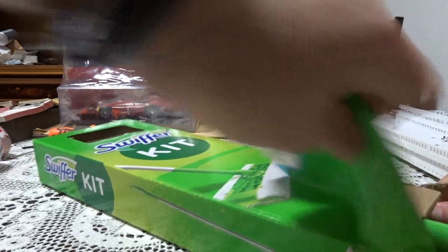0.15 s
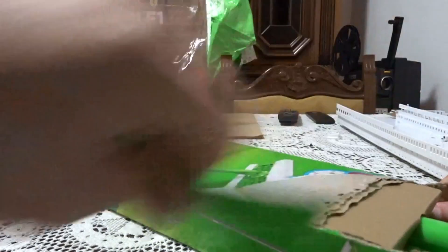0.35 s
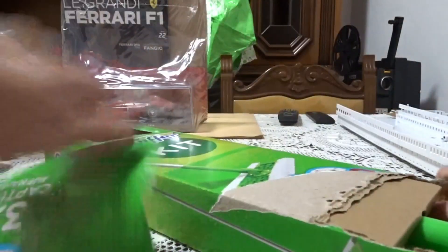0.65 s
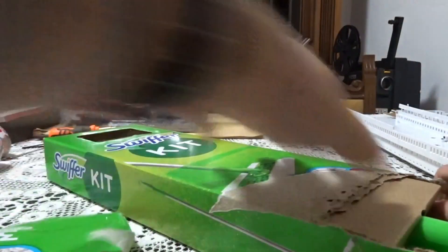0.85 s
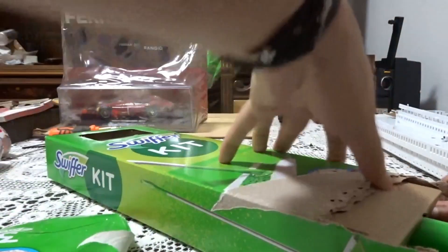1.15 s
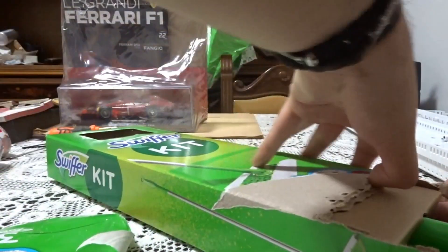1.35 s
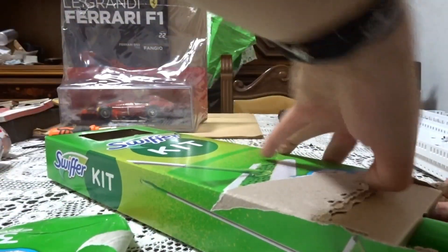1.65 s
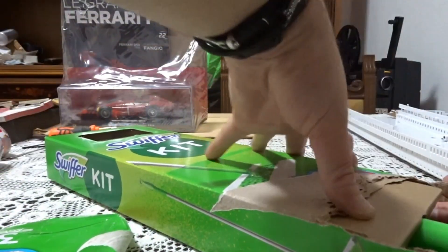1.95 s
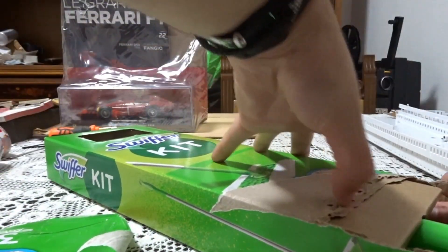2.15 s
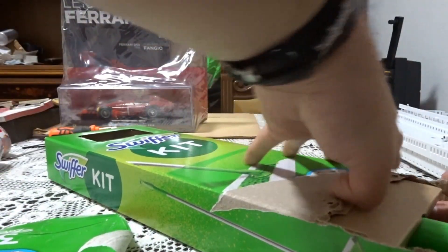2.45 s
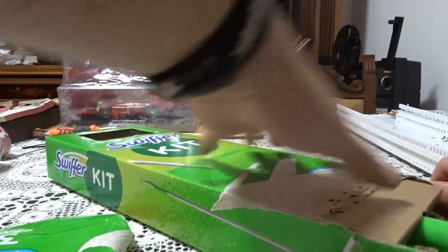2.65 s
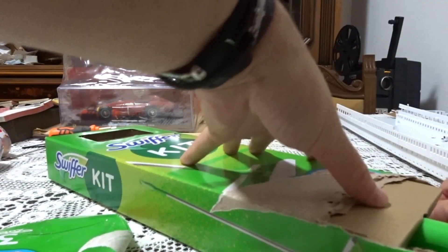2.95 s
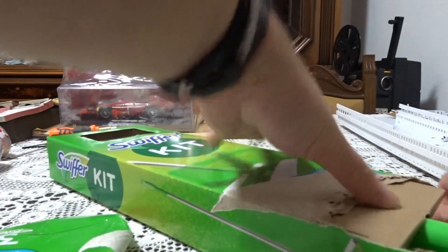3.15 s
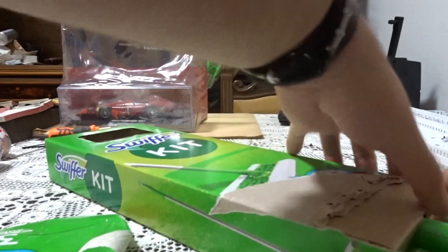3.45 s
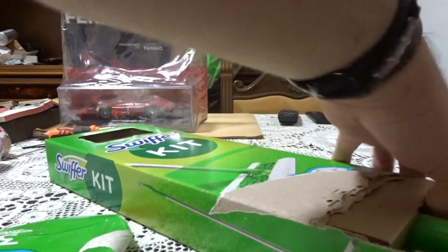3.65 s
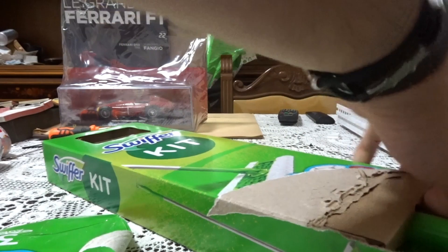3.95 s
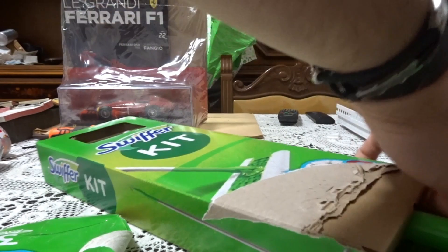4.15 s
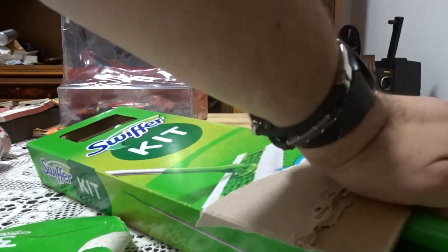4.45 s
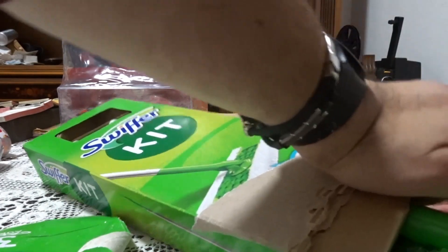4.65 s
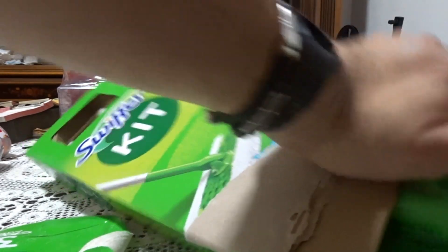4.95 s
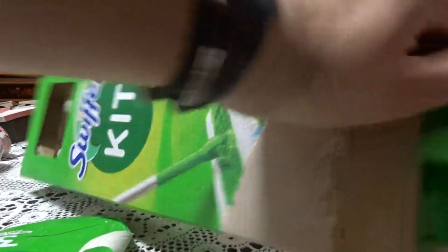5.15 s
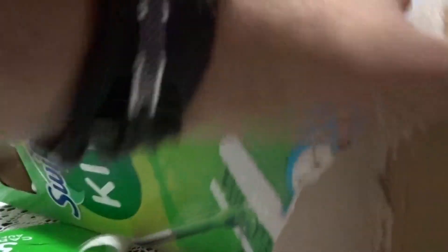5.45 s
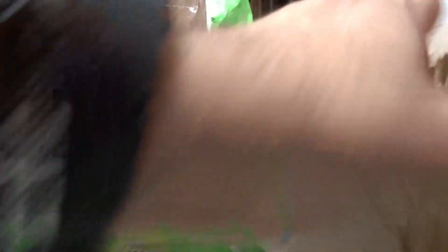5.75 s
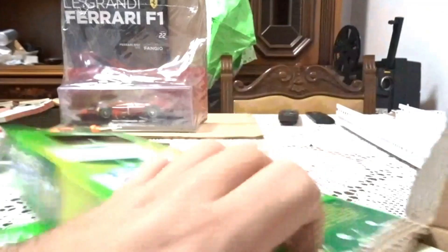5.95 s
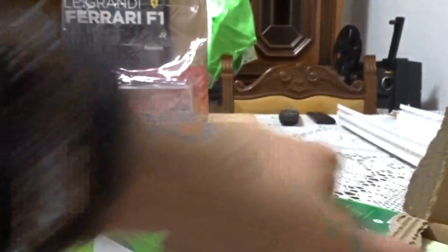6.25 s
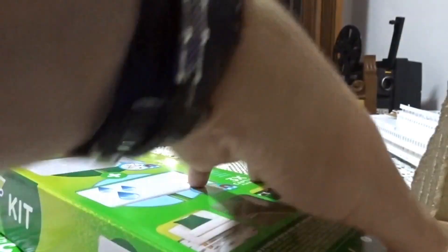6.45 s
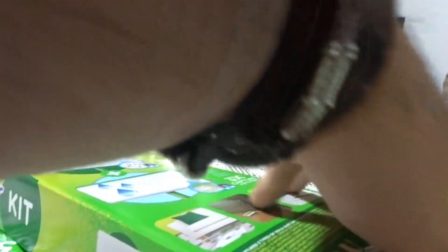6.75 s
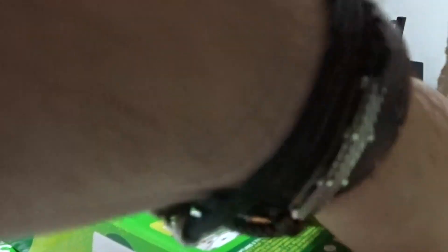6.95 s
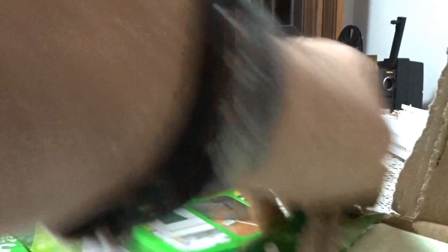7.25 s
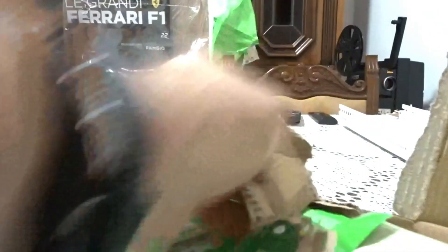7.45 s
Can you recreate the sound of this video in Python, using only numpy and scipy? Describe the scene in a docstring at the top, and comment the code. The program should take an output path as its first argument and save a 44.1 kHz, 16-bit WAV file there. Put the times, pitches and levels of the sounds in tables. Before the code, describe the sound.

Hands tear stiff paperboard, slightly to the right and near the microphone. Dry, grainy ripping stops abruptly, leaving fingernail picks and dull pops from the hollow box over a faint hiss. A brief rip breaks the quiet, soft rubbing continues, crackling builds, the box flexes with low pops and rips again. After softer handling, rapid snaps crowd into a last crunchy tear. Short, dry indoor sound.

```python
"""A long rip of cardboard is heard first: hands tear open a box on a table, close to a small stereo camera.
Random fibre breaks crackle through the rips and the fingernail's picks, and shake the lid and hollow box.
Glue cracks and crease pops are decaying, phase-wandering tones with noise; knocks are struck panel modes;
faint narrow bands of noise swell and fade. Evenly decaying noise gives the furnished room's answer,
and shaped noise its faint background hush."""
import sys
import numpy as np
from scipy import signal
from scipy.fft import rfft, irfft, next_fast_len
from scipy.io import wavfile
from scipy.ndimage import uniform_filter1d, map_coordinates

SR = 44100
rng = np.random.default_rng(int(sys.argv[2]) if len(sys.argv) > 2 else 0)


def generate_wav(sig):
    """Save sig (samples, or channels by samples) to the path in sys.argv[1] as 16-bit PCM at SR."""
    pcm = np.round(np.clip(np.atleast_2d(sig).T, -1, 1) * 32767).astype(np.int16)
    wavfile.write(sys.argv[1], SR, pcm)


N = 334719

# spectrum of the background hush: f/Hz, level/dB
HUSH_SPECTRUM = [(160, -40), (310, -13), (760, -5), (2400, 0), (3600, 4.5), (11200, -25)]
# decay of the room, equally fast at all frequencies: f/Hz, time to fall by 60 dB/s
ROOM_DECAY = [(200, 0.12), (10000, 0.12)]
# coherence of diffuse sound: f/Hz, left-right likeness [0-1]
PORT_LIKENESS = [(300, 1), (1500, 0.19), (6000, 0.11)]
# level of the right port over the left: f/Hz, level difference/dB
RIGHT_OVER_LEFT = [(250, -1.5), (1200, 3), (10000, 2.5)]
# faint narrow bands of noise that swell and fade: start t/s, length/s, f/Hz, bandwidth/Hz, level/dB
NOISE_BANDS = [(0.806, 0.26, 2900, 200, -50.5), (3.145, 0.47, 2960, 150, -52.5),
               (4.482, 0.26, 4100, 400, -42), (4.495, 0.5, 710, 130, -44), (6.417, 0.37, 1670, 330, -39.5)]
# resonances of a panel pushed by the fingers: f/Hz, bandwidth/Hz, level/dB
PANEL_MODES = [(400, 114, 1.5), (1000, 450, -4.5)]
# low knocks of buckling panels: t/s, peak level/dB
PANEL_KNOCKS = [(2.361, -14), (2.381, -12.5), (2.868, -26.5), (2.891, -26.5), (2.906, -26.5),
                (2.946, -28.5), (2.958, -27), (2.97, -25), (2.996, -31), (3.022, -26.5), (3.066, -27.5),
                (5.399, -27), (5.491, -13), (5.509, -27)]
# resonances of the panels and air of the box: f/Hz, bandwidth/Hz, level/dB
BOX_MODES = [(321.6, 86, -2), (410, 58, 3.5), (486, 123, 0), (625, 117, -1)]
# bright cracks of glue and fibre bundles: t/s, peak level/dB, board f/Hz
GLUE_CRACKS = [(0.226, -18, 3250), (0.413, -2, 2810), (0.628, -16.5, 4880), (1.452, -21.5, 1000),
               (2.143, -17, 1035), (2.408, -22, 7100), (2.511, -19.5, 1116), (2.734, -12.5, 2600),
               (2.8, -4, 2610), (3.053, -20.5, 2770), (3.76, -18.5, 1015), (3.821, -10.5, 3520),
               (3.902, -15, 1860), (4.052, -10.5, 4105), (4.55, -19, 800), (4.667, -12, 4140),
               (4.746, -18.5, 1350), (4.782, -9.5, 2420), (4.819, -10.5, 2990), (5.014, -12, 5230),
               (5.231, -10, 1994), (5.717, -4.5, 943), (6.257, -28, 1160), (6.437, -26, 1520),
               (6.749, -17.5, 1690), (7.003, -22, 900), (7.089, -8.5, 1980), (7.172, -7.5, 1950),
               (7.202, -8, 2830), (7.215, -9, 1010), (7.23, -7.5, 3340), (7.238, -7, 2100),
               (7.251, -3.5, 2850), (7.299, -4, 1520), (7.329, -3, 3710), (7.365, -6.5, 4920),
               (7.43, -8, 1573), (7.437, -8, 1910), (7.51, -15, 4000), (7.53, -15.5, 1932)]
# duller pops of creases: t/s, peak level/dB, board f/Hz
CREASE_POPS = [(0.066, -9, 3560), (0.152, -8.5, 1810), (0.446, -10, 1765), (0.66, -18, 1275),
               (0.927, -17.5, 1045), (1.229, -23, 1004), (1.465, -27, 1030), (1.487, -22.5, 994),
               (1.684, -18.5, 960), (2.156, -25, 1100), (2.168, -31, 1000), (2.178, -23, 844),
               (2.364, -4.5, 1035), (3.088, -16.5, 1570), (4.764, -24, 1980), (5.186, -13.5, 2046),
               (5.192, -9, 1693), (5.294, -17, 985), (5.49, -13.5, 1035), (5.513, -18.5, 1560),
               (5.667, -18.5, 1260), (5.691, -10.5, 1200), (5.708, -13, 1190), (5.911, -10.5, 1300),
               (5.923, -9, 1104), (6.068, -21, 1700), (6.097, -17.5, 874), (6.508, -19.5, 1830),
               (7.268, -9.5, 823)]
# resonances of the lid lying on the box: f/Hz, bandwidth/Hz, level/dB
LID_MODES = [(1020, 156, 3), (1942, 120, -2.5), (3020, 130, -5)]
# resonances of the lid pulled loose: f/Hz, bandwidth/Hz, level/dB
FLAP_MODES = [(857, 167, -0.5), (1710, 610, 0), (2930, 1900, -10)]
# how much of the lid hangs loose: t/s, share [0-1]
LOOSE_SHARE = [(.8, 1), (.9, 0), (2.6, 0.13), (3.6, 0.9)]
# spectrum of breaking fibres: f/Hz, level/dB
FIBRE_SPECTRUM = [(1200, -14), (2200, -3), (3600, 0), (10400, -6), (11500, -9)]
# the hands never lie quite still: level/dB of the fibres, the shaken lid, the hollow box
RESTING_LEVELS = (-64.5, -55, -59)
# short picks and rubs at the torn edge: peak t/s, fall/s, fibre level/dB, lid level/dB, box level/dB
EDGE_PICKS = [(0.464, 0.089, -31, -31, -39), (.51, 0.78, -40.5, -41, -58),
              (0.937, 0.095, -45.5, -34.5, -32.5), (1.117, 0.16, -44, -44, -42.5),
              (1.213, 0.2, -44.5, -41, -42.5), (1.346, 0.045, -53, -40, -39.5),
              (1.476, 0.1, -43, -40.5, -37), (1.699, 0.17, -39.5, -36.5, -38.5),
              (1.854, 0.078, -46, -44, -38), (2.02, 0.27, -47, -54.5, -45), (2.134, 0.13, -44, -44, -34),
              (2.395, 0.19, -45, -35, -32.5), (2.545, 0.12, -40.5, -39.5, -42),
              (3.102, 0.46, -44.5, -44, -47.5), (3.424, 0.13, -45, -41.5, -38.5),
              (3.65, 0.54, -43.5, -45, -51), (3.826, 0.19, -39.5, -41.5, -67),
              (4.06, 0.29, -43.5, -46, -62), (4.264, 0.2, -40.5, -39.5, -52), (4.667, 0.059, -29, -32, -42),
              (5.289, 0.22, -38.5, -36.5, -35), (5.406, 0.28, -39.5, -38.5, -45),
              (5.51, 0.21, -64, -39, -38), (5.929, 0.23, -59, -29.5, -36), (6.268, 0.8, -50, -51, -57),
              (6.499, 0.53, -48.5, -45.5, -46.5), (6.658, 0.16, -37.5, -31.5, -40.5),
              (6.9, 1, -45.5, -44.5, -55)]
# long pulls: full pull reached t/s, rise/s, hold/s, fall/s, fibre level/dB, lid level/dB, box level/dB
LONG_RIPS = [(0, .01, 0.446, 0.03, -24, -29.5, -32.5), (2.79, 0.1, 0.0035, 0.17, -22.5, -25, -32),
             (4.8, 0.5, 0.07, 0.5, -34, -35, -42), (5.735, 0.1, 0.082, 0.24, -24, -26, -32.5),
             (7.09, 0.15, 0.066, 0.24, -34, -34, -40), (7.22, 0.15, 0.1, 0.13, -32, -32, -40),
             (7.395, 0.052, 0.051, 0.22, -24.5, -24, -36)]


def amp(db):
    """Definition of level: amplitude is 10 to the power dB/20."""
    return 10 ** (np.asarray(db) / 20)


def unit(x):
    """Normalization: scale to a root-mean-square value of one."""
    return x / np.sqrt(np.mean(x ** 2) + 1e-20)


def along(points, hz):
    """Interpolation of (f, value) points on a logarithmic frequency axis."""
    f, value = np.transpose(points)
    return np.interp(np.log(hz + 1), np.log(f + 1), value)


def wobble(rate):
    """Band-limited fluctuation: a smooth random curve with rate knots a second."""
    knots = rng.standard_normal(int(N * rate / SR) + 4)
    return map_coordinates(knots, [np.arange(N) * rate / SR])


def filtered(x, response):
    """Linear filtering: the spectrum is multiplied by a complex frequency response."""
    m = next_fast_len(N + SR // 2)
    return irfft(rfft(x, m) * response(np.fft.rfftfreq(m, 1 / SR)), m)[..., :N]


def modes(table):
    """Modal superposition: damped resonances of alternating sign add to a causal response."""
    def response(f):
        total = 0
        for k, (centre, width, db) in enumerate(table):
            resonance = 1j * f * width / (centre ** 2 - f ** 2 + 1j * f * width)
            total = total + (-1) ** k * amp(db) * resonance
        return total
    return response


def diffuse(pair):
    """Spatial coherence: unrelated signals are mixed so that both ports share the bass."""
    def mix(hz):
        angle = np.arccos(np.clip(along(PORT_LIKENESS, hz), -1, 1)) / 2
        return np.array([np.cos(angle), np.sin(angle)])
    mid, side = filtered(pair, mix)
    return np.array([mid + side, mid - side])


def slips(per_s, spread_db, clump_db, clumps_per_s, bed):
    """Intermittent impulses: clumped random breaks of unequal size over a bed of tiny ones."""
    happens = rng.random(N) < per_s / SR
    sizes = amp(spread_db * rng.standard_normal(N).clip(-2, 2))
    breaks = unit(happens * rng.standard_normal(N) * sizes)
    return amp(clump_db * wobble(clumps_per_s)) * (breaks + bed * rng.standard_normal(N))


def shifting(x, patchy_db):
    """Time-varying resonance: loose flaps change shape, so the colour shifts in short patches."""
    z = signal.stft(x, nperseg=256)[2]
    field = uniform_filter1d(rng.standard_normal(z.shape), size=4, axis=-2)  # across frequency
    field = uniform_filter1d(field, size=14, axis=-1)  # across time
    return signal.istft(z * amp(patchy_db * unit(field)), nperseg=256)[1][..., :N]


def hush():
    """Ambient noise: a shaped, diffuse spectrum whose level sways slowly."""
    level_db, sway_db = -54, 2
    noise = filtered(rng.standard_normal((2, N)), lambda hz: amp(along(HUSH_SPECTRUM, hz)))
    return amp(level_db + sway_db * wobble(4.36)) * unit(diffuse(noise))


def room(x):
    """Reverberation: convolution with noise that dies away equally fast, in 0.12 s, at all frequencies."""
    hz, t, z = signal.stft(rng.standard_normal((2, SR // 2)), SR, nperseg=256)
    decay = amp(-60 * t / along(ROOM_DECAY, hz)[:, None])
    tail = signal.istft(z * decay, SR, nperseg=256)[1]
    delayed = np.pad(x, (200, 0))[None]  # samples before the answer begins
    answer = signal.fftconvolve(delayed, tail / np.linalg.norm(tail[0]), axes=1)
    return diffuse(answer[:, :N])


def ports(x, lag_s):
    """Level and time differences: the box lies to the right; that port is nearer and less shaded."""
    side = np.array([[-.5], [.5]])

    def response(hz):
        level = amp(side * along(RIGHT_OVER_LEFT, hz))
        return level * np.exp(2j * np.pi * hz * lag_s * side)
    return filtered(x, response)


def noise_bands():
    """Resonant filtering of noise: faint, narrow, uneven bands swell and fade."""
    t, out = np.arange(N) / SR, np.zeros(N)
    for start, length, hz, width, db in NOISE_BANDS:
        uneven = slips(1500, spread_db=6, clump_db=1.5, clumps_per_s=30, bed=3.1)
        band = unit(filtered(uneven, modes([(hz, width, 0)])))
        progress = ((t - start) / length).clip(0, 1)
        swell = np.sqrt(np.sin(np.pi * progress).clip(0))
        out += amp(db) * swell * band
    return out


def knocks():
    """Impulse response: a short soft push bends the panel once and it rings for a few cycles."""
    push_s = .0005  # time to the push's peak
    blows, t = np.zeros(N), np.arange(SR // 10) / SR
    s, db = np.transpose(PANEL_KNOCKS)
    blows[np.round(s * SR).astype(int)] = amp(db)
    push = np.pad(t * np.exp(-t / push_s), (0, N - len(t)))
    thud = filtered(push, modes(PANEL_MODES))[:SR // 4]
    return signal.fftconvolve(blows, thud / np.abs(thud).max())[:N]


def effort():
    """Energy addition: strokes rise and fall exponentially and their powers add (fibres, lid, box)."""
    swing_db = 30  # gained over each rise, lost over each fall
    pick_rise = 0.51  # as a share of the fall
    t = np.arange(N) / SR
    power = np.ones((3, N)) * amp(RESTING_LEVELS)[:, None] ** 2
    picks = [(s, pick_rise * fall, 0, fall, *levels) for s, fall, *levels in EDGE_PICKS]
    for s, rise, hold, fall, *levels in LONG_RIPS + picks:
        near = slice(max(0, round((s - 1) * SR)), round((s + 2) * SR))
        before = (s - t[near]) / rise
        after = (t[near] - s - hold) / fall
        away = np.maximum(before, after).clip(0)
        power[:, near] += amp(levels)[:, None] ** 2 * amp(-2 * swing_db * away)
    return np.sqrt(power)


def grains():
    """Random emission: small pops (t/s, peak/dB, f/Hz) follow the lid's shaking as the flap bends."""
    count, above_lid_db, spread_db = 420, 7.5, 5
    middle_hz, roam = 1800, 0.456  # roam in natural-log frequency
    when, size = rng.random(count), rng.standard_normal(count).clip(-2, 2)
    at = (when * N).astype(int)
    db = 20 * np.log10(effort()[1][at]) + above_lid_db + spread_db * size
    pitch = middle_hz * np.exp(roam * wobble(25)[at])
    return list(zip(at / SR, db, pitch))


def snaps():
    """Sudden stress release: a sharp crack and a few rough, damped cycles of the freed board."""
    crack_noise_db, pop_noise_db = 0, -16  # noise of the break against the ring of the board
    out, t = np.zeros(N + SR), np.arange(SR // 20) / SR
    events = [(*row, crack_noise_db) for row in GLUE_CRACKS]
    events += [(*row, pop_noise_db) for row in CREASE_POPS + grains()]
    for s, db, hz, noise_db in events:
        draw = rng.standard_normal((3, len(t)))
        drift = 0.22 * np.cumsum(draw[0]) * np.sqrt(hz / 2000)  # the board is lossy, its phase wanders
        rattle = uniform_filter1d(draw[1], size=4) - uniform_filter1d(draw[1], size=30)
        life = 0.013 + 11 / hz  # s to fall by 60 dB: larger, lower boards ring longer
        board = (np.sin(2 * np.pi * hz * t + drift) + 0.65 * rattle) * amp(-60 * t / life)
        bright = draw[2] - uniform_filter1d(draw[2], size=8)
        crack = bright * amp(noise_db - 60 * t / 0.014)
        snap = (board + crack) * (1 - np.exp(-t / 0.00025))
        out[round(s * SR):][:len(t)] += amp(db) * snap / np.abs(snap).max()
    struck = out[:N]
    return struck + filtered(struck, modes(BOX_MODES))  # every snap knocks the hollow box


def handling():
    """Forced vibration: fibres crackle along the tear; jerks of the same effort shake lid and box."""
    t = np.arange(N) / SR
    fibre_level, lid_level, box_level = effort()

    # one crackle common to both ports, then one for each port
    crackle = np.array([slips(1000, spread_db=5.0, clump_db=3.0, clumps_per_s=130, bed=1.0)
                        for spot in range(3)])
    coloured = filtered(shifting(crackle, patchy_db=4.0), lambda hz: amp(along(FIBRE_SPECTRUM, hz)))
    fibres = fibre_level * unit(coloured)

    jerks = slips(900, spread_db=2.5, clump_db=2.2, clumps_per_s=70, bed=1.2)
    heard = np.array([jerks, jerks])  # each port faces another part of the lid
    closed = unit(filtered(shifting(heard, patchy_db=1), modes(LID_MODES)))
    opened = unit(filtered(shifting(heard, patchy_db=3.5), modes(FLAP_MODES)))
    loose = np.interp(t, *np.transpose(LOOSE_SHARE)).clip(0, 1)
    lid = lid_level * (np.sqrt(1 - loose) * closed + np.sqrt(loose) * opened)

    def box_response(hz):
        return modes(BOX_MODES)(hz) / (1 + 1j * hz / 800)  # heavy panels miss the fastest jerks
    hollow = box_level * unit(filtered(shifting(jerks, patchy_db=1.7), box_response))
    return fibres[0] + lid + hollow, fibres[1:]


def scene():
    """Superposition: direct sources and the room's answer reach the ports, over the hush."""
    near, scattered = handling()  # the tear is a line: part of its crackle differs between ports
    near = near + snaps() + knocks() + noise_bands()
    answer = room(near.mean(axis=0))
    return ports(near + amp(2.0) * scattered + amp(-9.0) * answer, lag_s=4e-5) + hush()


def record(dry):
    """Saturation and band limiting: peaks are rounded, bass is lost, the top is cut off."""
    top_hz, bass_hz = 11150, 190
    rounded = 0.93 * np.tanh(dry / 0.87)
    return filtered(rounded, lambda hz: (1j * hz / (1j * hz + bass_hz)) ** 3 * (hz < top_hz))


dry = scene()
out = record(dry)
generate_wav(out)
```